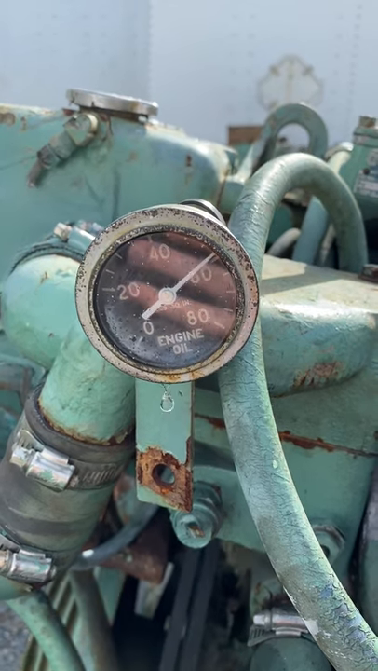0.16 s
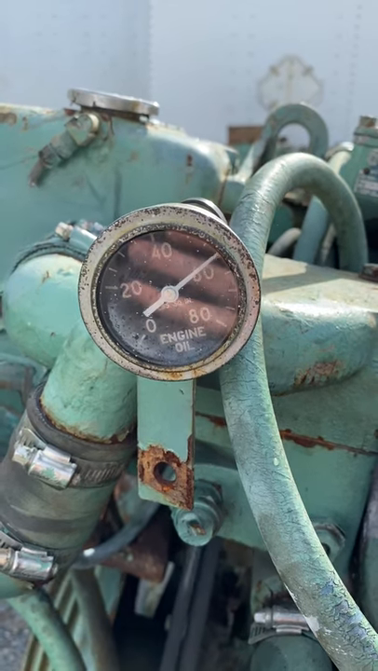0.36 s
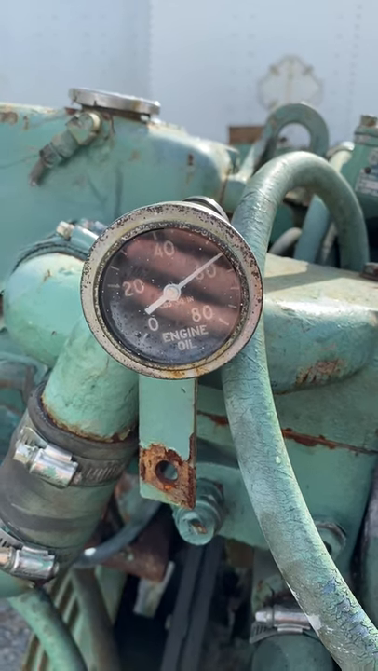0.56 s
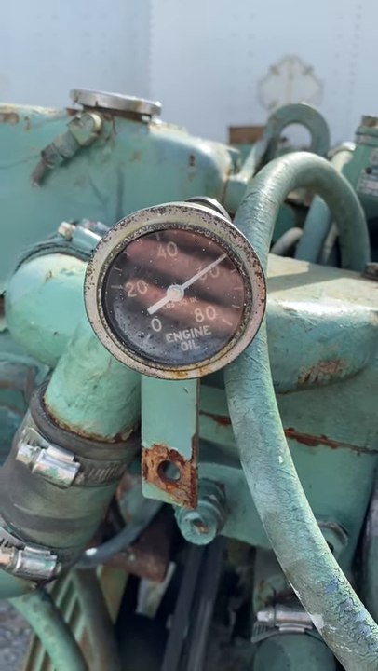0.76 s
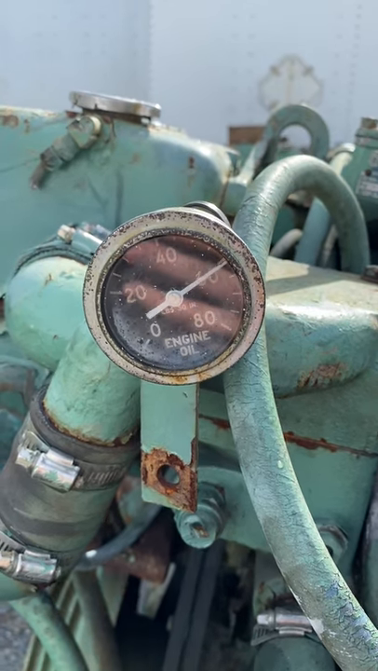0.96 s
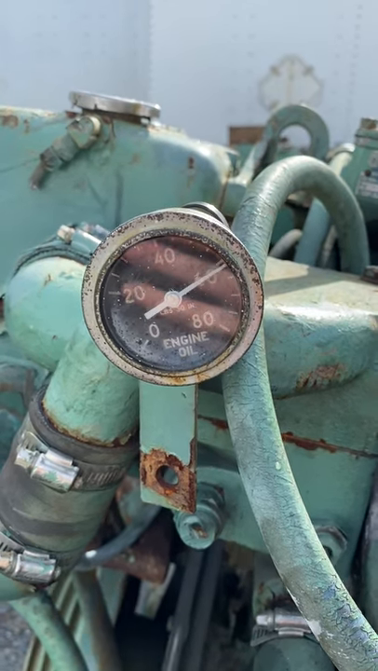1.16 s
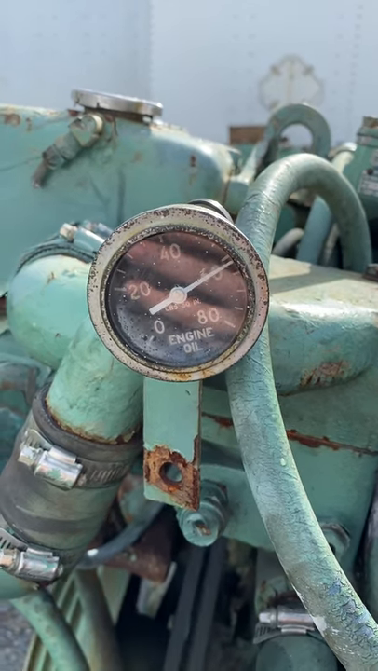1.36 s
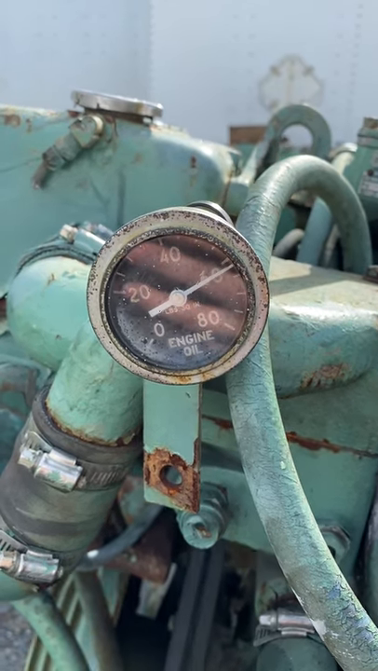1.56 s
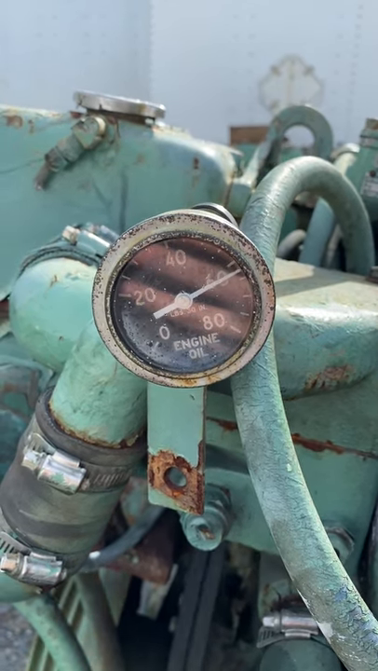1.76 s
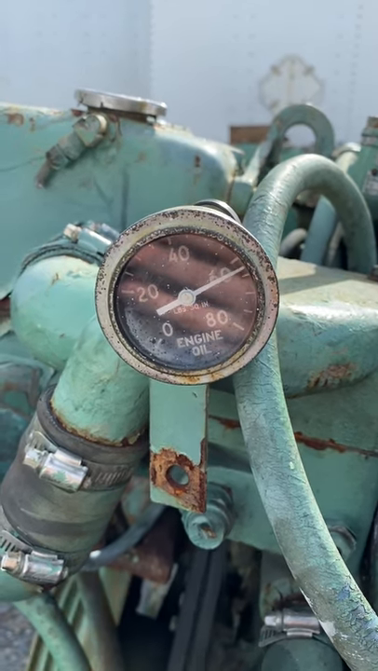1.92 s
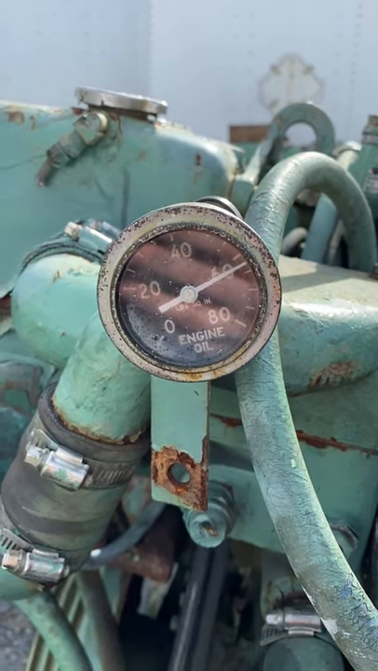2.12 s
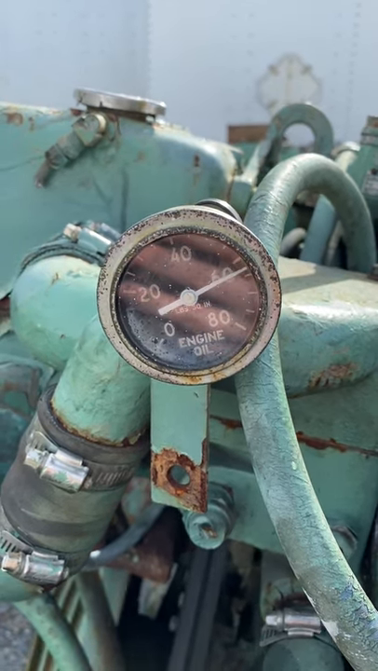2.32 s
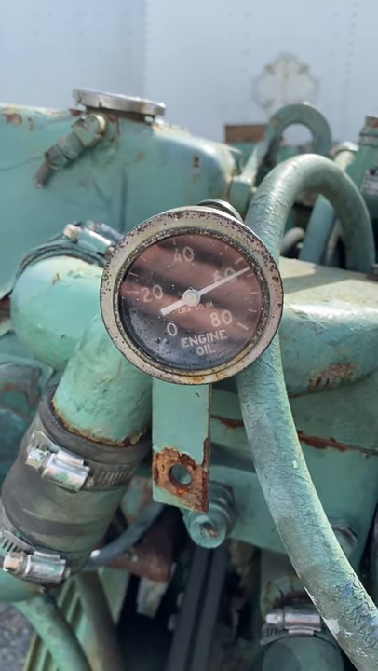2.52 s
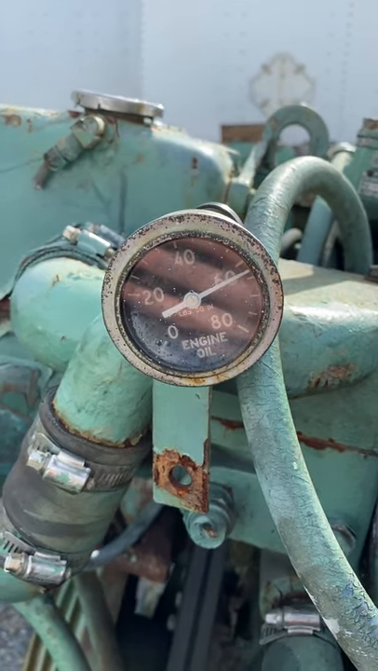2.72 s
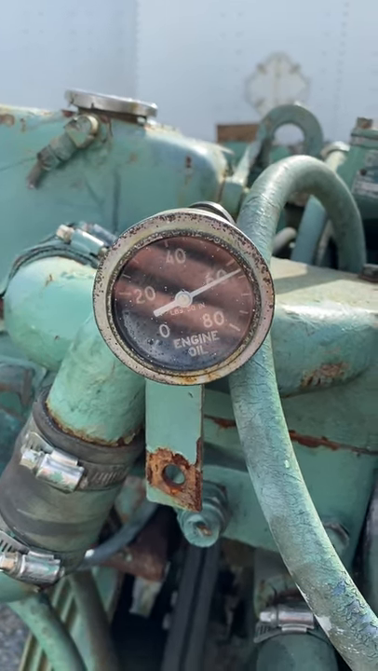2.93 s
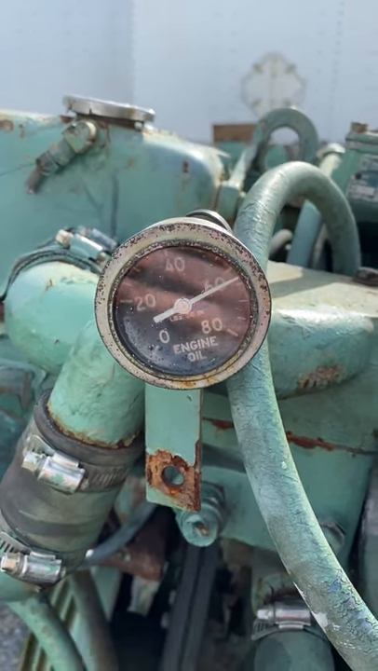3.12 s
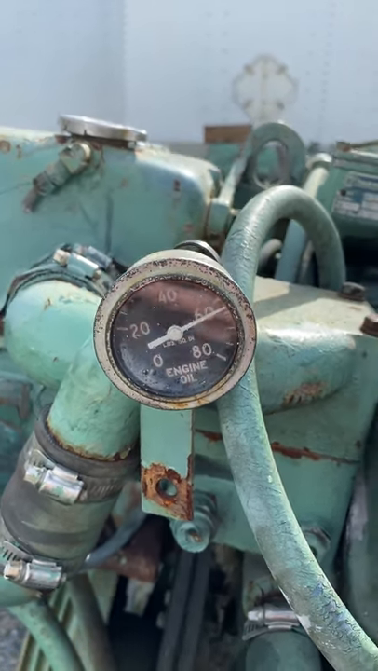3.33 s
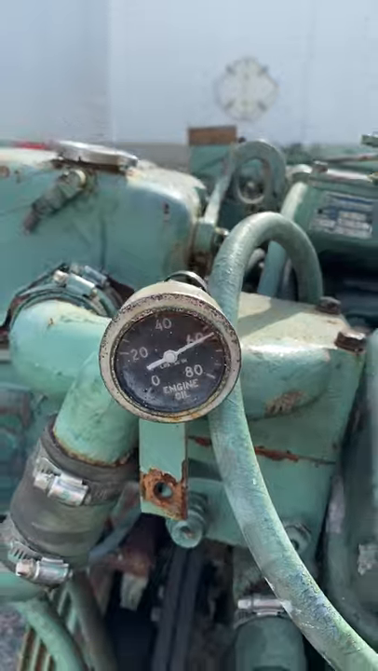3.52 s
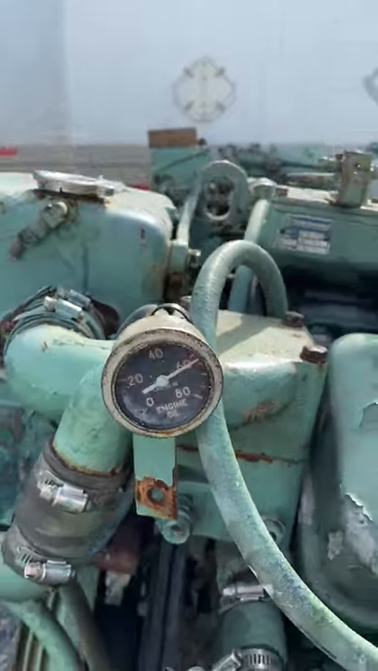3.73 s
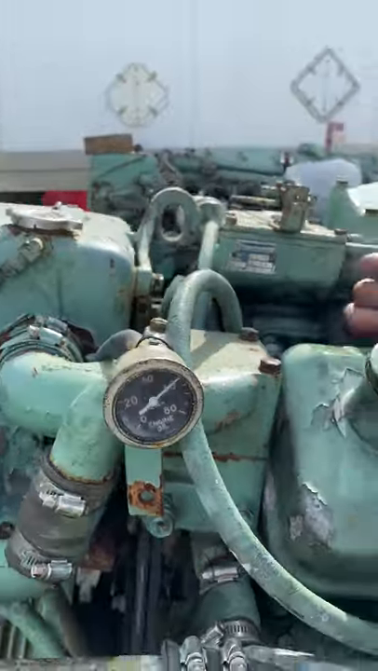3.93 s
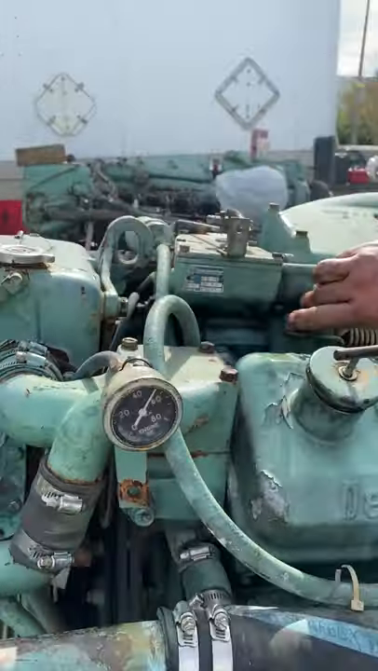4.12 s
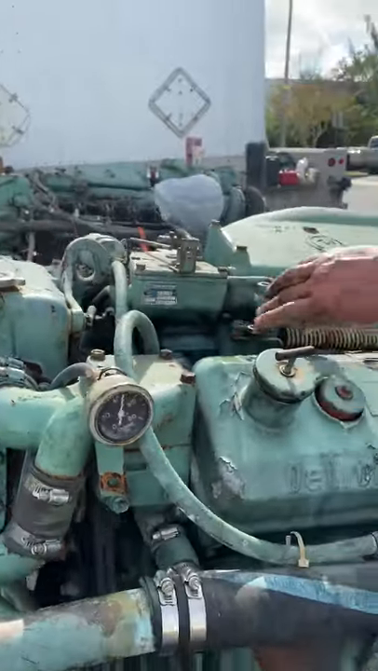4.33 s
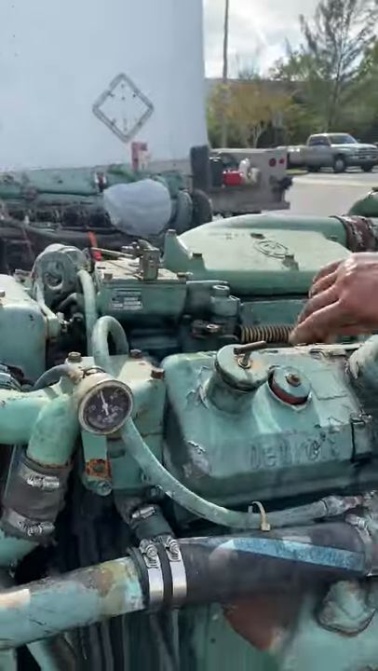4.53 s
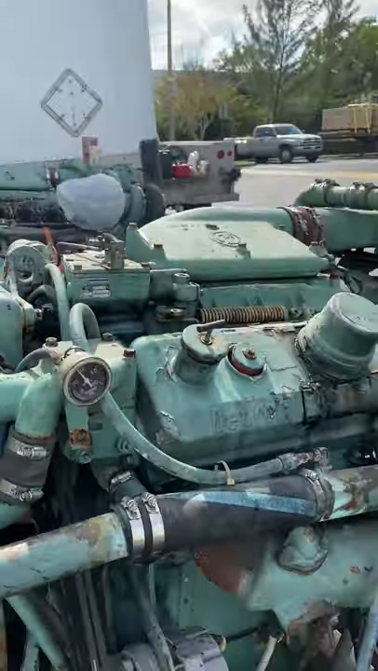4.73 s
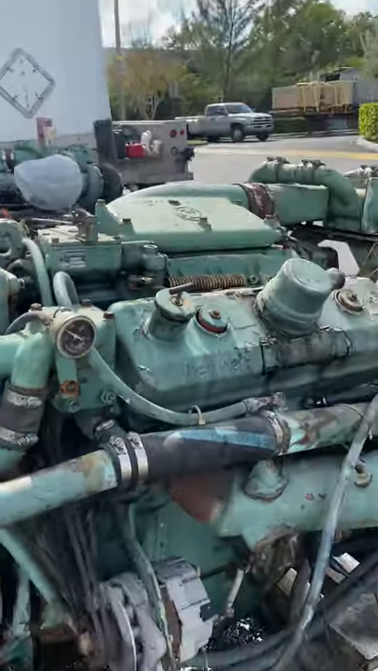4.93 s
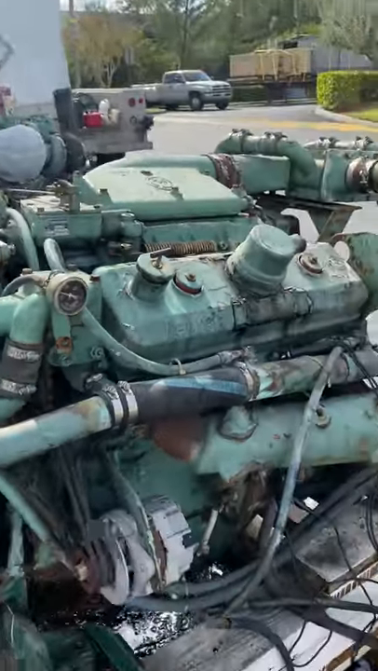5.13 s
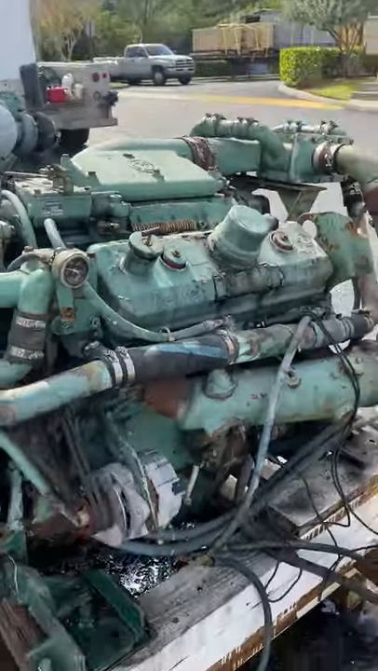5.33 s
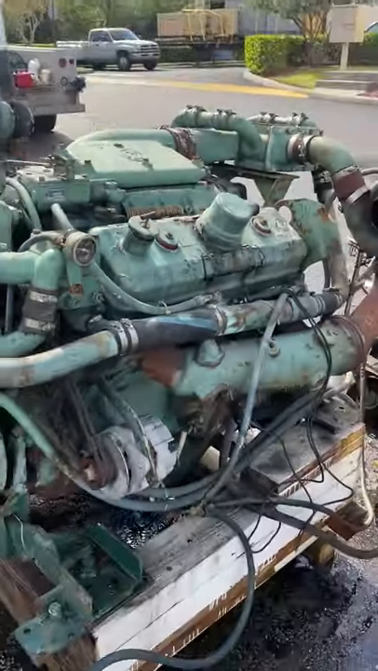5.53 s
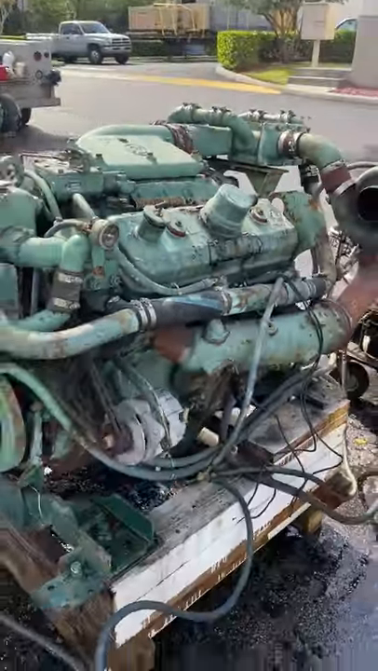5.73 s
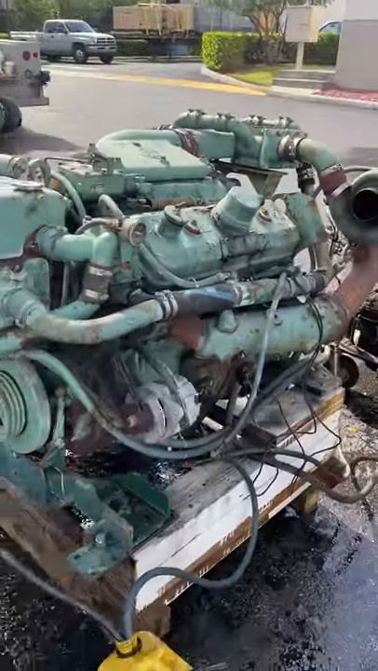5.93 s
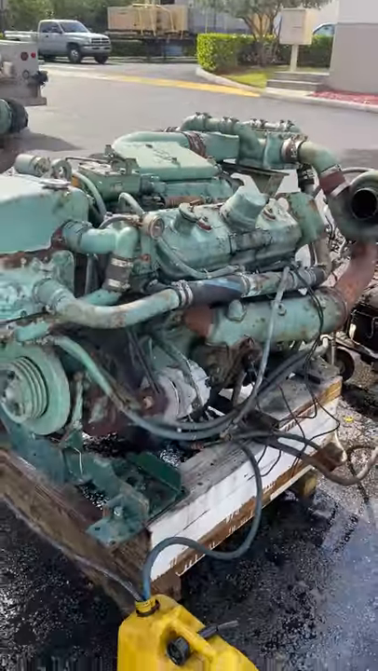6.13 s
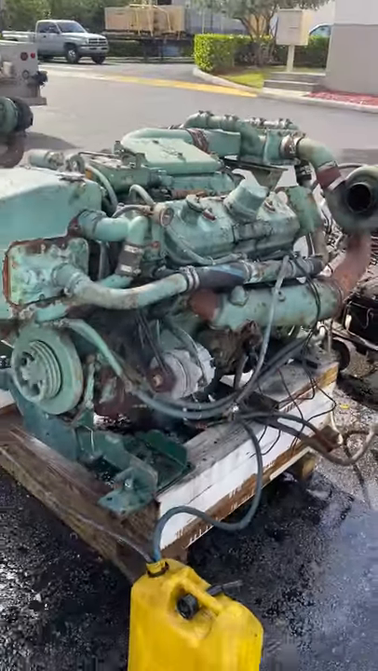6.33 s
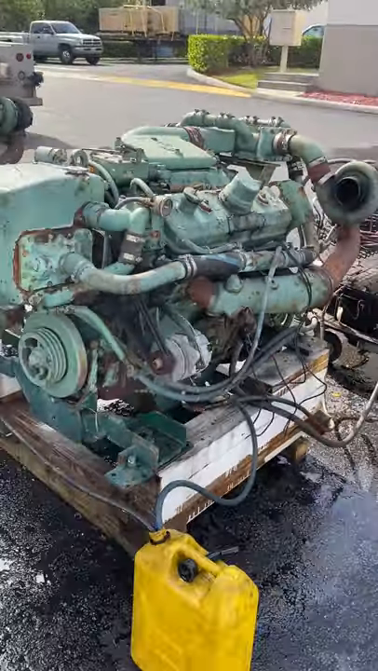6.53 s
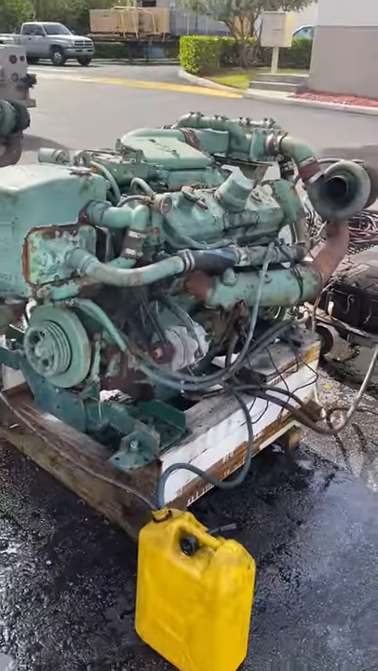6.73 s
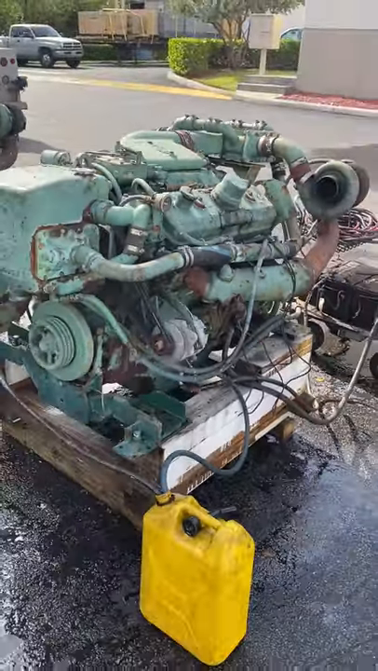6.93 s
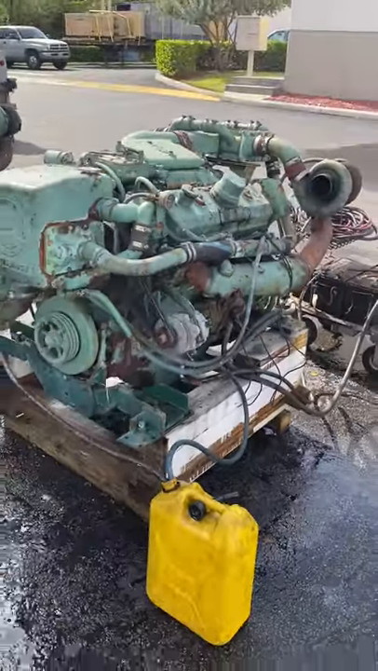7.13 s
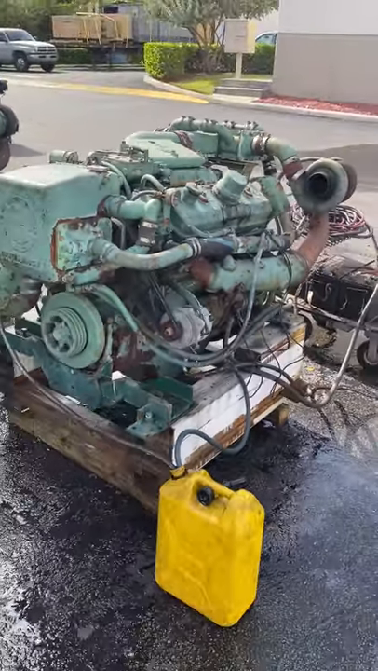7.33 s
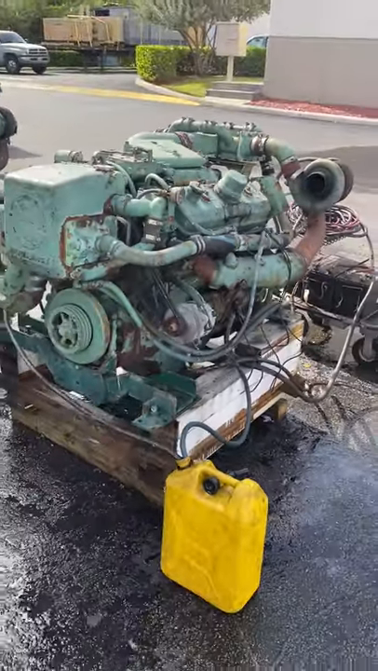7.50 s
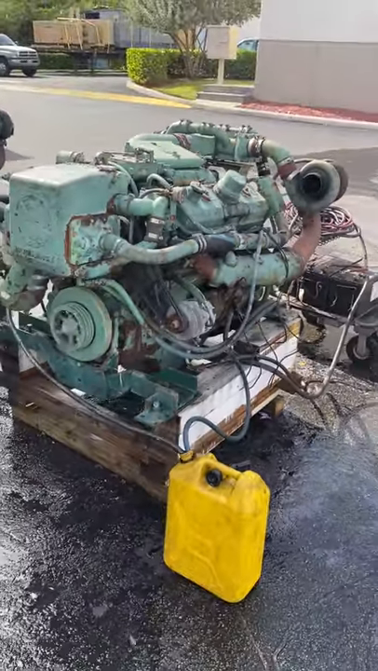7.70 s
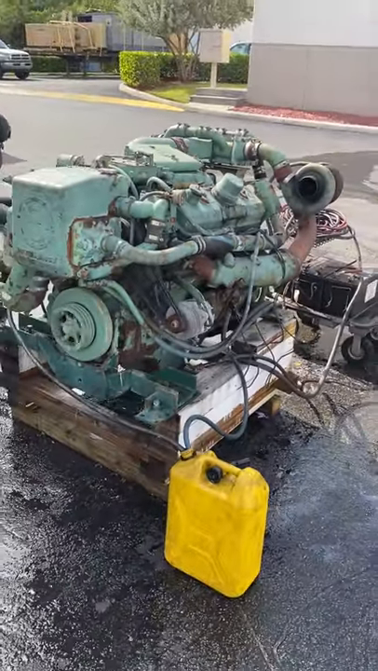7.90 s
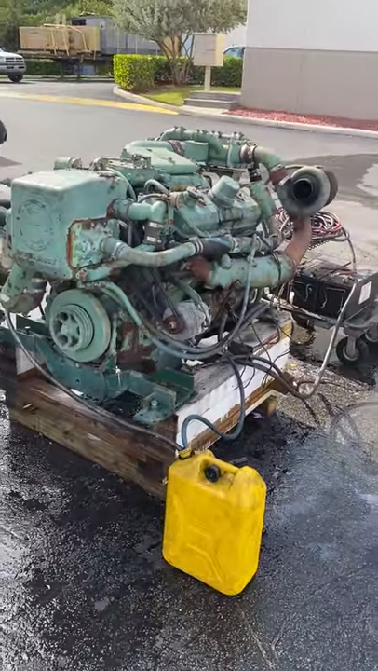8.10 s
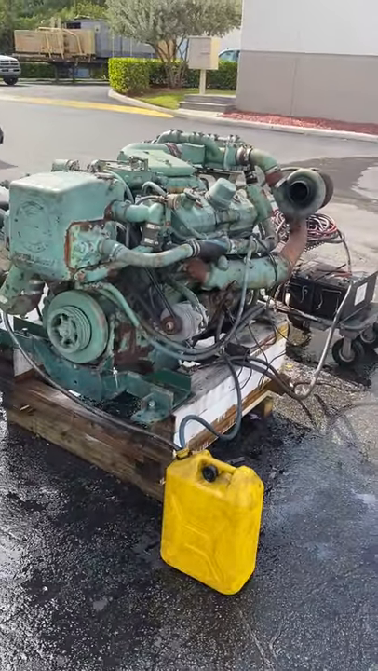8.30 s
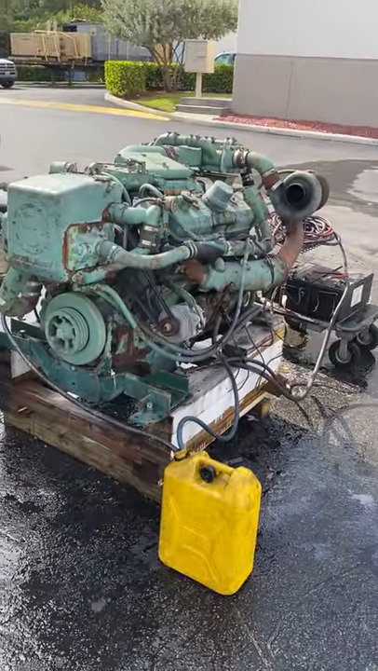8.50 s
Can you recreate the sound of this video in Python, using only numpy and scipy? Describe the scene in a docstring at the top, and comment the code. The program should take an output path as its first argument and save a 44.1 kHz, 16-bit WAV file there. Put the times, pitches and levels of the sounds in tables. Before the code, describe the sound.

A big diesel engine drones and clatters loudly at raised revs, then winds down, catches with a few clinks and settles into a steady idle.

```python
"""The loud drone and clatter of a big eight-cylinder two-stroke diesel, close up on a pallet in an open
yard; the microphone is a hand-held stereo phone. Exhaust blasts make the drone, valve gear rings the
block, air and injection hiss, the turbo whistles and there is a little wind. The engine revs up in two
steps; the fuel is cut and it coasts down with a low rumble, buzzing a loose panel, then catches with
clinks and clacks and settles to idle. From the fuel cut on, the listener steps back."""
import sys
import numpy as np
from scipy import signal
from scipy.fft import rfft, irfft, next_fast_len
from scipy.io import wavfile
from scipy.ndimage import uniform_filter1d

SR = 44100
rng = np.random.default_rng(int(sys.argv[2]) if len(sys.argv) > 2 else 0)


def to_wav(sig):
    """Store sig (one row per channel, or 1-D mono) as 16-bit WAV at the path in sys.argv[1].

    Samples outside -1..1 are clipped; the rate is SR.
    """
    pcm = np.clip(np.atleast_2d(sig), -1, 1) * 32767
    pcm = np.round(pcm).astype(np.int16)
    wavfile.write(sys.argv[1], SR, pcm.T)  # frames by channels


N = 377275

# Crankshaft speed: time_s, turns_per_s
CRANK_SPEED = [(0.0, 20.49), (0.45, 20.88), (0.9, 20.99), (1.03, 21.53), (1.2, 22.46), (1.37, 22.79),
               (2.0, 22.93), (2.15, 23.18), (2.4, 23.74), (2.6, 23.84), (3.15, 23.73), (3.5, 23.72),
               (3.57, 23.13), (4.2, 16.21), (4.65, 12.03), (4.9, 10.13), (5.0, 10.2), (5.5, 11.55),
               (5.75, 11.47), (6.3, 11.28), (7.8, 11.27), (8.1, 11.18), (8.56, 11.17)]
# Fuelling: time_s, coasting_share (unburnt air pumped, 0-1), catching_share (heavy fuelling, 0-1)
FUELLING = [(0, 0, 0), (3.55, 0, 0), (3.7, .6, 0), (3.9, .95, 0), (4.75, 1, 0), (4.9, 0, 1), (5.9, 0, 1),
            (6.5, 0, 0), (8.6, 0, 0)]
# Where the microphone is: time_s, distance (0 close up, 1 stepped back)
MIC_DISTANCE = [(0, 0), (3.6, 0), (4.3, .6), (5.5, .85), (7, 1), (8.6, 1)]
# Balance of the exhaust tones: crank_multiple, coasting_db, catching_db, then level_db at each steady speed
EXHAUST_TONES = [(2, -10, -66, -66, -62, -66, -53), (3, -9, -66, -66, -47, -45, -51),
                 (4, 11, -56, -48, -32, -26, -28), (5, 0, -49, -48, -50, -44, -46),
                 (6, 10, -43, -46, -29, -32, -39), (7, 11, -40, -40, -32, -27, -24),
                 (8, 15, -29, -31, -18, -22, -22), (9, 9, -59, -46, -23, -22, -18),
                 (10, 1, -53, -46, -36, -39, -47), (11, 9, -47, -43, -27, -29, -31),
                 (12, 13, -33, -47, -24, -21, -25), (13, 14, -39, -44, -30, -40, -41),
                 (14, 7, -35, -44, -30, -53, -53), (15, 4, -42, -47, -38, -32, -31),
                 (16, 8, -33, -41, -42, -33, -34), (17, 4, -40, -42, -36, -43, -51),
                 (18, 9, -39, -45, -39, -48, -37), (19, 9, -51, -53, -34, -34, -50),
                 (20, 8, -34, -37, -27, -23, -24), (21, 2, -39, -42, -32, -39, -35),
                 (22, 4, -39, -38, -35, -35, -32), (23, 2, -37, -38, -38, -36, -44),
                 (24, 2, -39, -39, -29, -40, -41), (25, 2, -34, -38, -35, -45, -53),
                 (26, 0, -44, -44, -35, -54, -36), (27, 2, -62, -52, -45, -38, -37),
                 (28, 3, -47, -48, -39, -35, -38), (29, 0, -48, -55, -41, -34, -43),
                 (30, 1, -58, -46, -39, -36, -43), (31, 1, -66, -47, -47, -36, -38),
                 (32, 4, -63, -47, -37, -36, -41), (33, 1, -50, -48, -40, -38, -41),
                 (34, 2, -49, -46, -37, -34, -34), (35, 0, -47, -48, -34, -36, -32),
                 (36, 2, -53, -46, -34, -44, -48), (37, 3, -59, -49, -39, -42, -40),
                 (38, 5, -64, -55, -34, -46, -47), (39, -2, -48, -59, -35, -41, -45),
                 (40, -1, -44, -54, -47, -50, -48), (41, -2, -51, -60, -41, -49, -49),
                 (42, -1, -51, -51, -37, -59, -62), (43, -1, -48, -51, -39, -48, -47),
                 (44, -2, -53, -60, -56, -43, -43), (45, -1, -45, -54, -45, -49, -47),
                 (46, 0, -62, -52, -49, -49, -53), (47, 1, -63, -50, -57, -46, -45),
                 (48, -2, -54, -50, -42, -50, -43), (49, 1, -48, -49, -44, -41, -42),
                 (50, 1, -57, -50, -48, -47, -50), (51, -1, -49, -51, -57, -44, -57),
                 (52, -5, -64, -52, -48, -43, -47), (53, -4, -66, -66, -41, -49, -41),
                 (54, -3, -66, -59, -38, -52, -55), (55, -1, -65, -57, -40, -40, -39),
                 (56, -2, -56, -54, -46, -46, -54), (57, -5, -55, -54, -49, -48, -51),
                 (58, -4, -48, -50, -51, -59, -47), (59, -4, -63, -53, -52, -43, -49),
                 (60, -3, -64, -57, -58, -66, -49), (61, -4, -58, -55, -56, -41, -48),
                 (62, -2, -58, -50, -53, -49, -51), (63, -3, -57, -56, -47, -49, -49),
                 (64, -3, -55, -55, -48, -48, -46), (65, -3, -63, -53, -49, -59, -60),
                 (66, -3, -63, -52, -45, -42, -39), (67, -3, -51, -51, -51, -49, -56),
                 (68, -5, -58, -57, -42, -48, -44), (69, -2, -63, -55, -47, -45, -50),
                 (70, -5, -64, -61, -49, -41, -39), (71, -4, -53, -51, -43, -55, -45),
                 (72, -2, -52, -52, -43, -40, -48), (73, -2, -64, -55, -46, -44, -44),
                 (74, -2, -66, -58, -38, -42, -50), (75, 0, -66, -65, -43, -47, -46),
                 (76, -2, -66, -60, -47, -43, -45), (77, -1, -66, -63, -42, -36, -47),
                 (78, -1, -59, -50, -32, -37, -41), (79, -5, -56, -56, -46, -37, -38),
                 (80, -4, -64, -57, -44, -57, -54), (81, -1, -66, -55, -45, -48, -45),
                 (82, -1, -60, -58, -47, -42, -48), (83, -2, -66, -57, -51, -53, -47),
                 (84, -2, -66, -55, -50, -61, -51)]
# Idle and the three raised speeds: turns_per_s
STEADY_SPEEDS = [11.3, 20.8, 22.9, 23.75]
# Exhaust level, which clatter and hiss follow: time_s, level_db
EXHAUST_LEVEL = [(0, -14), (1.0, -13), (1.22, -11.5), (1.5, -13.5), (2.0, -14), (2.35, -13), (3.53, -14.5),
                 (3.65, -19), (3.95, -22), (4.5, -24.5), (4.8, -27.5), (5.0, -23), (5.3, -22),
                 (6.15, -25.5), (7.0, -26.5), (8.56, -26)]
# Resonances of the open pipes when pumping air: pitch_hz, gain_db
PIPE_RESPONSE = [(30, -12), (50, 3), (70, 1), (90, 3), (110, -1), (130, 0), (150, 6), (170, 10), (195, 8),
                 (220, 6), (245, 9), (270, 5), (310, -1), (350, -1), (390, 5), (430, 10), (470, 8),
                 (520, 5), (600, 0), (700, 3), (800, 0), (1000, -4), (1200, -1), (1500, -6), (1800, 0)]
# Colour of the drone at the last standing place: pitch_hz, gain_db
LAST_PLACE_COLOUR = [(110, 0), (135, 10), (147, -6), (180, 2), (225, -6), (290, 1), (350, 4), (378, 0),
                     (403, 10), (416, -2), (428, 8), (480, -6)]
# Ring of the block, close up and stepped back: pitch_hz, gain_db
BLOCK_RING_NEAR = [(300, -25.5), (600, -19), (1200, -13), (1800, -12.5), (1990, -11.5), (2420, -11.5),
                   (3090, -31), (4230, -20.5), (5000, -19.5), (6500, -54.5), (11000, -120)]
BLOCK_RING_FAR = [(280, -41), (470, -9), (800, -6), (987, -4), (1070, -5), (1530, -11.5), (2290, -21),
                  (3050, -29), (3680, -31), (4760, -55), (5000, -33), (6500, -58), (11000, -120)]
# Parts that tick once a turn: angle_turns, pitch_hz, t60_s, relative_db
TICKING_PARTS = [(.77, 3650, .022, 1), (.8, 3950, .02, 0), (.81, 1300, .04, 0), (.86, 1520, .045, 2),
                 (.93, 1420, .04, -1), (.3, 1050, .04, -2), (.68, 1150, .035, -3), (.85, 920, .045, 8),
                 (.93, 800, .045, 3), (.45, 680, .05, -3), (.56, 1750, .04, 1), (.83, 1750, .04, 0),
                 (.2, 1700, .03, -5), (.12, 2250, .03, -2), (.44, 2300, .03, -7), (.17, 6100, .03, -12),
                 (.16, 8000, .02, -18)]
# Gain of all the ticks: time_s, gain_db
TICK_GAIN = [(0, -33), (3.5, -56), (4.85, -47), (4.97, -35.5), (5.4, -37), (6.5, -43), (7.1, -37),
             (8.6, -35.5)]
# Colour of the air and injection hiss: pitch_hz, near_db, far_db
HISS_SPECTRUM = [(59.7, -30, -10), (209, -15, -13), (330, -12, -13), (460, -6, -15), (720, -13, -14),
                 (980, -21, -19), (1230, -20, -19), (1720, -22, -19), (2290, -22, -22), (3250, -25.5, -24),
                 (4300, -28, -29), (4800, -33, -34.5), (5300, -28.5, -29.5), (5800, -32, -32),
                 (6500, -30, -30), (7200, -33, -34), (8880, -34.5, -37.5), (10900, -42.5, -46),
                 (13500, -38.5, -45), (16000, -40.5, -38)]
# Turbo whistle: time_s, pitch_hz, level_db
TURBO_WHISTLE = [(0, 10800, -70), (1.5, 11400, -72), (3.5, 13600, -54), (4.0, 13200, -66),
                 (4.6, 11800, -85), (5, 11200, -94), (8.6, 10000, -97)]
# Swells of low rumble near 50 Hz (the coasting engine at 4.43 and 4.6 s, else wind): peak_s, level_db
RUMBLE_SWELLS = [(0.0, -38), (0.36, -42), (0.5, -37), (0.82, -36), (1.08, -30), (1.23, -24), (1.43, -44),
                 (1.64, -50), (3.1, -37), (4.43, -37), (4.6, -33), (6.0, -31), (6.3, -36), (7.1, -32),
                 (7.43, -43)]
# Modes of the loose panel: pitch_hz, relative_db
PANEL_MODES = [(450, 0), (498, -4), (1160, -11)]
# Buzzes of that panel: start_s, length_s, level_db
PANEL_BUZZES = [(3.62, .1, -20), (4.37, .13, -24), (4.5, .08, -32)]
# Blows on a hard part as the engine catches: start_s, level_db
CLINK_BLOWS = [(4.9731, -39), (5.0696, -28), (5.1652, -39), (5.26, -29), (5.3028, -39), (5.346, -33),
               (5.435, -40), (5.8726, -45), (5.9589, -38), (6.0496, -39), (6.1335, -40), (6.2148, -42)]
# Modes of that part: pitch_hz, relative_db, t60_s
CLINK_MODES = [(3700, 1, .02), (3950, -2, .016), (3450, -5, .016), (4200, -8, .012), (1770, -3, .03)]
# Valve-gear clacks: start_s, level_db, pitch_hz
VALVE_CLACKS = [(4.9861, -27, 2230), (5.1083, -30.5, 2130), (5.1312, -33, 2310), (5.3048, -38, 2110),
                (5.3597, -33, 2250), (5.6451, -31, 2100), (5.906, -34.5, 1930), (6.1719, -29.5, 1950),
                (6.2532, -33, 1940), (6.34, -39, 2330)]
# How alike the left and right microphone ports sound: pitch_hz, likeness (0-1)
PORT_LIKENESS = [(60, 1), (330, .99), (560, 0.87), (1000, 0.61), (2000, 1), (4000, 0.33), (8000, 1),
                 (11000, 0.57)]
# Phase lead of the left port, close up and stepped back: pitch_hz, lead_rad
PORT_LEAD_NEAR = [(0, 0), (400, -0.12), (690, -0.6), (1030, -0.1), (1290, -0.2), (2240, 0.3), (3100, 1.6),
                  (3880, 1.1), (4310, 1.2), (4910, 3.5), (5510, 6.7), (6030, 7.1), (9560, 8.3),
                  (10400, 9.0), (11000, 9.5)]
PORT_LEAD_FAR = [(0, 0), (600, 0.3), (860, -0.2), (1720, -0.3), (2840, 1.8), (3190, 2.9), (3790, 3.4),
                 (4650, 2.8), (4910, 3.5), (5250, 6.0), (5680, 7.0), (9390, 8.2), (10400, 9.2),
                 (11000, 9.4)]
# Balance of the ports, close up and stepped back: pitch_hz, left_minus_right_db
PORT_TILT_NEAR = [(60, 0.0), (130, 0.0), (270, 0.3), (560, -0.3), (1170, 0.0), (2460, -1.5), (5170, -1.5),
                  (10900, 0.0)]
PORT_TILT_FAR = [(60, 0.0), (130, 0.0), (330, 0.3), (560, 3.5), (1170, 5.5), (2460, -0.5), (5170, -0.5),
                 (10900, 0.0)]

T = np.arange(N) / SR
FFT_SIZE = next_fast_len(N + 8192)
HZ = np.fft.rfftfreq(FFT_SIZE, 1 / SR)
TURNS = np.cumsum(np.interp(T, *np.transpose(CRANK_SPEED))) / SR
FAR = np.interp(T, *np.transpose(MIC_DISTANCE))


def gain_of(db):
    return 10 ** (np.asarray(db) / 20)


def unit_rms(x):
    return x / np.sqrt(np.mean(x ** 2) + 1e-20)


def at_pitch(rows, hz, column=1):
    """One column of a spectrum table, read on a log-frequency axis."""
    table = np.transpose(rows)
    return np.interp(np.log(hz + 1), np.log(table[0] + 1), table[column])


def curve(rows, column=1, t=T):
    """One column of a time table, read at times t."""
    table = np.transpose(rows)
    return np.interp(t, table[0], table[column])


def wander(rate_hz, t=T, count=1):
    """Rows of slow random drift, rms 1."""
    steps = rng.standard_normal((count, int(t[-1] * 40) + 40))
    smooth = signal.lfilter([1], [1, -np.exp(-2 * np.pi * rate_hz / 40)], steps)[:, 30:]
    return np.array([np.interp(t * 40, np.arange(len(row)), row) for row in unit_rms(smooth)])


def coloured(x, gain):
    """Filters x by a gain given on the FFT bins."""
    return irfft(rfft(x, FFT_SIZE) * gain, FFT_SIZE)[..., :N]


def ring(hz, db, t60_s, samples=3000):
    """One mode of struck metal: a dying sine with a 1 ms attack."""
    t = T[:samples]
    return gain_of(db - 60 * t / t60_s) * np.sin(2 * np.pi * hz * t) * np.minimum(t / .001, 1)


def each_turn(angles, sizes, scatter_db, slip_s):
    """Clicks at the same crank angles in every turn, a little different each time."""
    due = np.arange(int(TURNS[-1]))[:, None] + angles
    slip, scatter = rng.standard_normal((2, *due.shape))
    times = np.interp(due, TURNS, T) + slip_s * slip
    at = np.clip(times * SR, 0, N - 1).astype(int)
    return np.bincount(at.ravel(), (sizes * gain_of(scatter_db * scatter)).ravel(), N)


def step_back(near, far):
    """Crossfades from the close sound to the distant one as the microphone moves."""
    return (1 - FAR) * near + FAR * far


def beside_exhaust(offset_db, coasting_db, catching_db, far_db):
    """A level in dB that follows the exhaust and shifts with fuelling and distance."""
    fuelling_db = coasting_db * curve(FUELLING, 1) + catching_db * curve(FUELLING, 2)
    return curve(EXHAUST_LEVEL) + offset_db + fuelling_db + far_db * FAR


def exhaust_amplitudes(multiple, speed, t):
    """Strength of each exhaust tone: blasts when firing, air through the resonant pipes when coasting."""
    coasting, catching = curve(FUELLING, 1, t), curve(FUELLING, 2, t)
    _, coasting_db, catching_db, *steady_db = np.transpose(EXHAUST_TONES)
    running_db = np.array([np.interp(speed, STEADY_SPEEDS, row) for row in np.transpose(steady_db)])
    fired = gain_of((1 - catching) * running_db + catching * catching_db[:, None]) ** 2
    pumped = gain_of(coasting_db[:, None] + at_pitch(PIPE_RESPONSE, multiple * speed)) ** 2
    power = (1 - coasting) * fired / fired.sum(0) + coasting * pumped / pumped.sum(0)
    drift_db = wander(1.5, t, len(multiple)) * (.6 + .012 * multiple + .6 * coasting)
    # Blasts differ from turn to turn, so the high tones flutter, most of all as the engine catches.
    rough_db = np.minimum(multiple / 40, 1) * (4 * catching + .8 * coasting)
    flutter_db = wander(9, t, len(multiple)) * (.014 * multiple + rough_db)
    place_db = np.interp(t, [7.0, 7.8], [0, 1]) * at_pitch(LAST_PLACE_COLOUR, multiple * speed)
    return np.sqrt(2 * power) * gain_of(curve(EXHAUST_LEVEL, 1, t) + drift_db + flutter_db + place_db)


def exhaust_phases(multiple, speed, t, throb_turns=.41, chirp_turns=.1):
    """Unequal pipes scatter the tones' phases; three groups still peak together once a turn."""
    scatter = rng.random(multiple.shape) * np.where(multiple > 9, 1, .28)
    cycles = scatter - multiple * throb_turns  # the low tones peak with the hardest-blasting cylinder
    thumping = (multiple >= 29) & (multiple <= 38)
    thump_turns = np.interp(speed, [STEADY_SPEEDS[0], STEADY_SPEEDS[-1]], [.12, .55])
    cycles = np.where(thumping, .6 * scatter - multiple * thump_turns, cycles)
    gear_mesh = (multiple >= 76) & (multiple <= 80)
    cycles = np.where(gear_mesh, .1 * scatter - multiple * chirp_turns, cycles)
    jitter_rad = wander(8, t, len(multiple)) * .00005 * multiple * speed  # uneven blasts
    return 2 * np.pi * cycles + jitter_rad


def exhaust():
    """Eight unequal blasts a turn, with the gear mesh, make tones on multiples of the crank speed."""
    t, tone_t, turns = T[::128], T[::8], TURNS[::8]
    speed = curve(CRANK_SPEED, 1, t)
    multiple = np.array(EXHAUST_TONES)[:, :1]
    amplitudes = exhaust_amplitudes(multiple, speed, t)
    phases = exhaust_phases(multiple, speed, t)
    tones = sum(np.interp(tone_t, t, size) * np.cos(2 * np.pi * k * turns + np.interp(tone_t, t, phase))
                for k, size, phase in zip(multiple, amplitudes, phases))
    return signal.resample_poly(tones, 8, 1)[:N]


def clatter(count=140, spread_db=3.5, near_bank_db=2.0):
    """Valves, rockers and injectors knock in a pattern that repeats each turn and ring the block."""
    angle, sign = rng.random(count), rng.choice([-1, 1], count)
    knock_db = spread_db * rng.standard_normal(count)
    knock_db += near_bank_db * np.cos(2 * np.pi * (angle - .87))  # the near cylinder bank is louder
    knocks = each_turn(angle, sign * gain_of(knock_db), scatter_db=1.8, slip_s=.00003)
    knocks /= np.sqrt(curve(CRANK_SPEED))
    near = unit_rms(coloured(knocks, gain_of(at_pitch(BLOCK_RING_NEAR, HZ))))
    far = unit_rms(coloured(knocks, gain_of(at_pitch(BLOCK_RING_FAR, HZ))))
    level_db = beside_exhaust(-21, coasting_db=-.8, catching_db=2, far_db=7)
    return gain_of(level_db) * step_back(near, far)


def ticks():
    """Single parts ring briefly once a turn, each driven by a three-click rattle."""
    lag_turns, sizes = np.array([0, .017, .045]), np.array([1, .6, .55])
    out = np.zeros(N)
    for angle, hz, t60_s, db in TICKING_PARTS:
        rattle = each_turn(angle + lag_turns, sizes, scatter_db=1.4, slip_s=.00012)
        out += signal.oaconvolve(rattle, ring(hz, db, t60_s, samples=4000))[:N]
    return out * gain_of(curve(TICK_GAIN))


def breathing(turn_db=.9, firing_db=.2, flutter_db=1.0):
    """The swell of the hiss, in dB, with each turn and each firing, plus a random flutter."""
    beat_db = turn_db * np.cos(2 * np.pi * (TURNS - .22)) + firing_db * np.cos(2 * np.pi * 8 * TURNS)
    return beat_db + flutter_db * unit_rms(uniform_filter1d(rng.standard_normal(N), size=300))


def hiss(breath_db):
    """Air and injection noise that breathes with the engine; its treble band sets the level."""
    treble = (HZ > 2500) & (HZ < 9000)
    noise = rng.standard_normal(N)
    shapes = [gain_of(at_pitch(HISS_SPECTRUM, HZ, column)) * (HZ > 40) for column in (1, 2)]
    near, far = (coloured(noise, shape / np.sqrt(np.sum(shape[treble] ** 2) / len(HZ)))
                 for shape in shapes)
    level_db = beside_exhaust(-20.5, coasting_db=3, catching_db=-1, far_db=-.5)
    return gain_of(level_db + breath_db) * step_back(near, far)


def turbo():
    """The turbo's thin, wavering whistle lags behind the engine speed."""
    hz = curve(TURBO_WHISTLE, 1) + 25 * wander(6)[0]
    return gain_of(curve(TURBO_WHISTLE, 2)) * np.sin(2 * np.pi * np.cumsum(hz) / SR)


def low_rumble(rumble_hz=52, rise_db_per_s=247, fall_db_per_s=209, width=.15):
    """Low noise swells over a faint breeze: twice from the coasting engine, otherwise from wind."""
    low_band = (HZ / rumble_hz) ** 5 / (1 + (HZ / rumble_hz) ** 8)
    centre, side = unit_rms(coloured(rng.standard_normal((2, N)), low_band))
    breeze = gain_of(-63 - FAR - 2 * wander(3)[0])
    swells = sum(gain_of(db + np.minimum(rise_db_per_s * (T - peak_s), fall_db_per_s * (peak_s - T)))
                 for peak_s, db in RUMBLE_SWELLS)
    return (breeze + swells) * np.array([centre + width * side, centre - width * side])


def panel():
    """A loose panel buzzes in short swells as the falling speed passes its resonances."""
    modes = sum(gain_of(db) * np.sin(2 * np.pi * (hz * T + rng.random())) for hz, db in PANEL_MODES)
    swell = sum(gain_of(db) * np.sin(np.pi * np.clip((T - start_s) / length_s, 0, 1)) ** 2
                for start_s, length_s, db in PANEL_BUZZES)
    return swell * modes


def clinks():
    """Sharp blows on one hard part ring brightly as the engine catches."""
    blows = np.zeros(N)
    for start_s, db in CLINK_BLOWS:
        blows[round(start_s * SR)] = gain_of(db)
    part = sum(ring(hz, db, t60_s) for hz, db, t60_s in CLINK_MODES)
    return signal.oaconvolve(blows, part)[:N]


def clacks():
    """Different parts of the valve gear each give one duller ring at their own pitch."""
    out = np.zeros(N)
    for start_s, db, hz in VALVE_CLACKS:
        clack = ring(hz, db, t60_s=.039)
        out[round(start_s * SR):][:len(clack)] += clack
    return out


def yard_reflections(x, t60_s=.1):
    """The sound after a scatter of short reflections, with its broad colour kept."""
    echo = rfft(rng.standard_normal(6000) * gain_of(-60 * T[:6000] / t60_s), FFT_SIZE)
    return coloured(x, echo / np.sqrt(uniform_filter1d(abs(echo) ** 2, size=600)))


def microphone_ports(direct, scattered):
    """Each port has its own phase and level; scattered sound pushes the two in opposite senses."""
    likeness = np.clip(at_pitch(PORT_LIKENESS, HZ), 0, 1)
    centre = rfft(direct, FFT_SIZE)
    side = np.sqrt((1 - likeness) / (1 + likeness)) * rfft(scattered, FFT_SIZE)
    positions = []
    for lead, tilt in ((PORT_LEAD_NEAR, PORT_TILT_NEAR), (PORT_LEAD_FAR, PORT_TILT_FAR)):
        lead_rad = np.interp(HZ, *np.transpose(lead))
        half = gain_of(at_pitch(tilt, HZ) / 2) * np.exp(.5j * lead_rad)
        left, right = (centre + side) * half, (centre - side) / half
        positions.append(irfft([left, right], FFT_SIZE)[:, :N])
    return step_back(*positions)


def scene():
    """The engine arrives direct and scattered; the clinks and low rumble are added at the ports."""
    breath_db = breathing()
    tonal = exhaust() + ticks() + clacks() + panel() + turbo()
    direct = tonal + clatter() + hiss(breath_db)
    scattered = yard_reflections(tonal) + clatter() + hiss(breath_db)
    slightly_left = gain_of([[1.5], [-1.5]])
    return microphone_ports(direct, scattered) + clinks() * slightly_left + low_rumble()


def record(dry, ceiling=.9, centre_edge_hz=10650, side_edge_hz=15780):
    """The phone rounds off the highest peaks and cuts the treble lower in the centre than at the sides."""
    def lowpass(x, hz):
        return signal.oaconvolve(x, signal.firwin(511, hz, window=("kaiser", 9), fs=SR), "same")

    left, right = dry / (1 + abs(dry / ceiling) ** 6) ** (1 / 6)
    centre = lowpass((left + right) / 2, centre_edge_hz)
    side = lowpass((left - right) / 2, side_edge_hz)
    return np.array([centre + side, centre - side])


dry = scene()
out = record(dry)
to_wav(out)
```